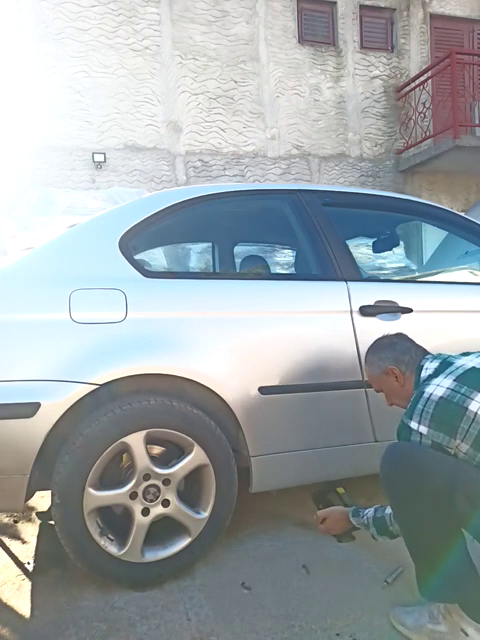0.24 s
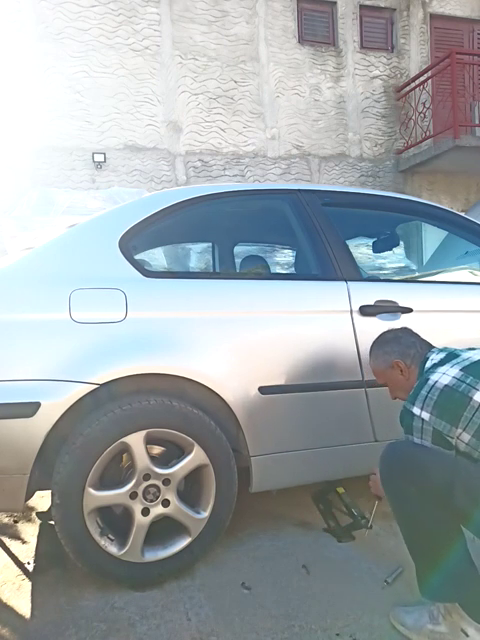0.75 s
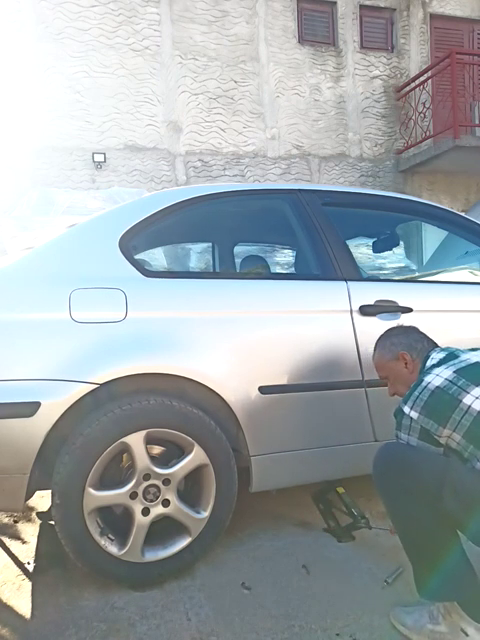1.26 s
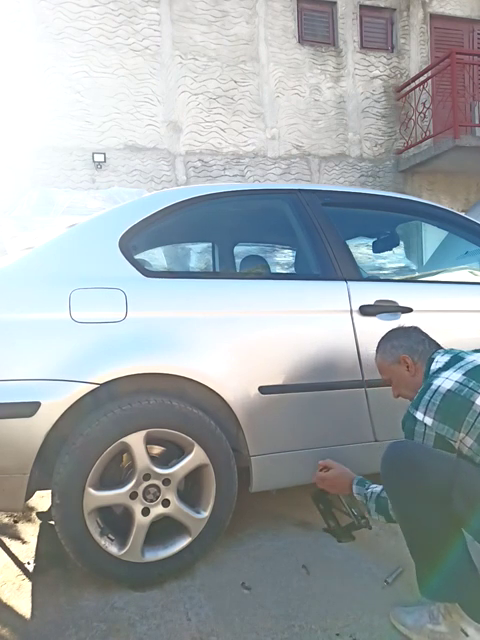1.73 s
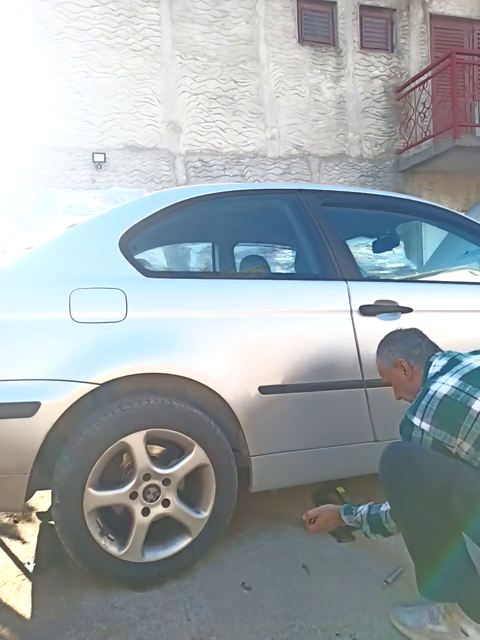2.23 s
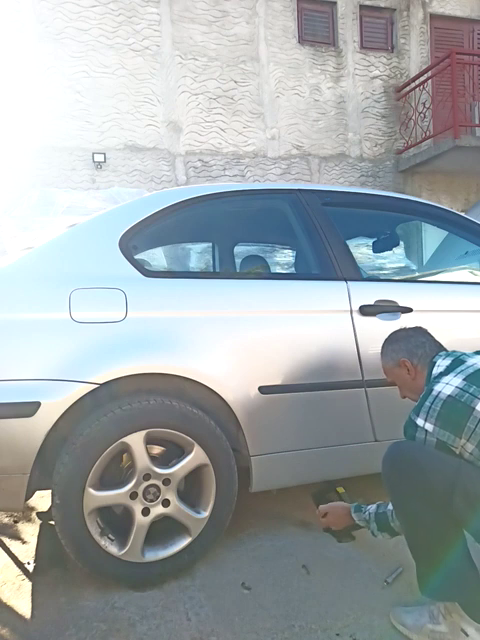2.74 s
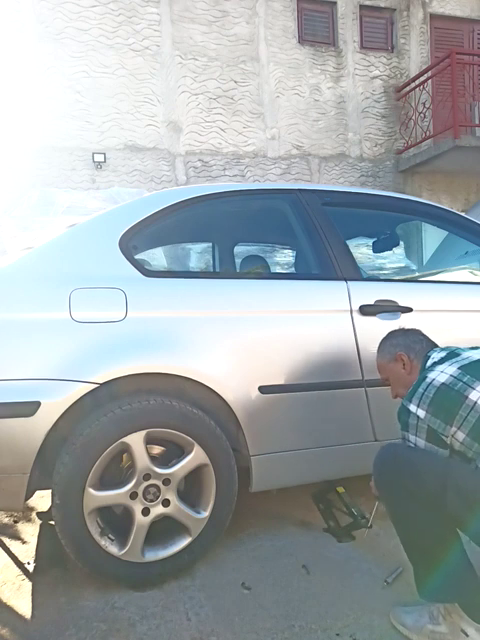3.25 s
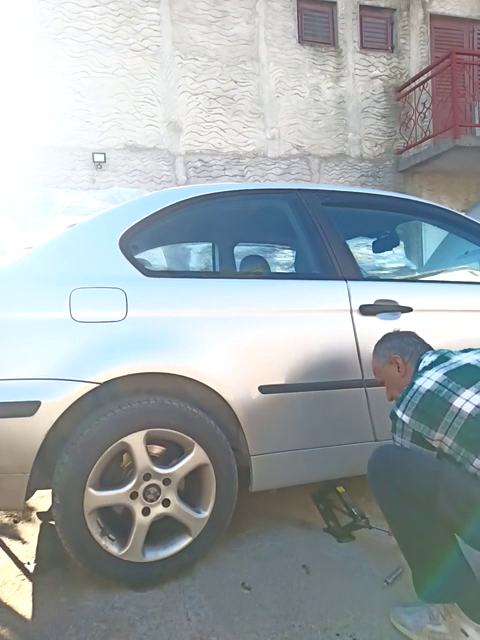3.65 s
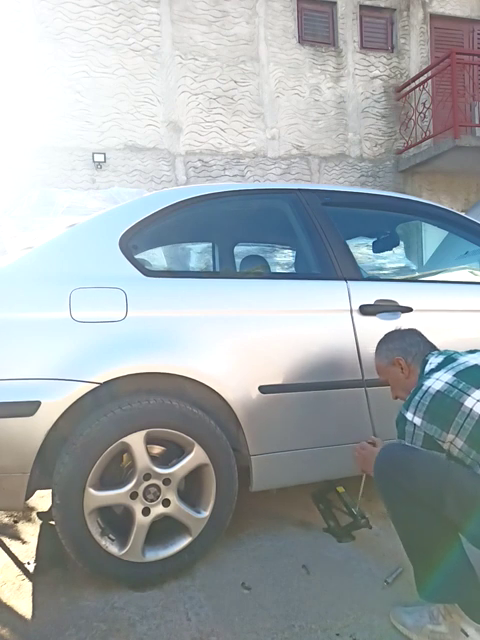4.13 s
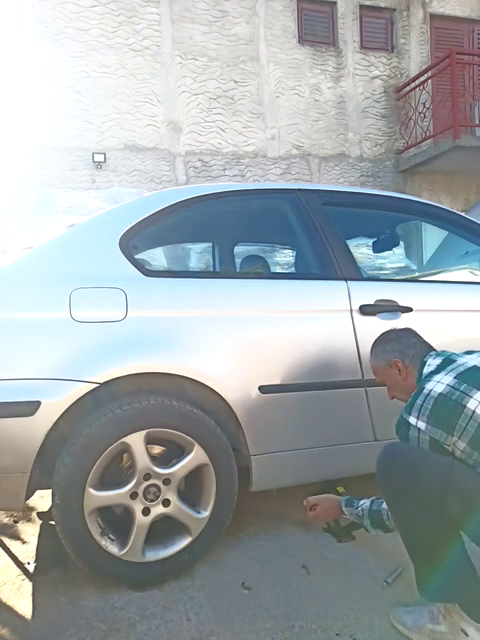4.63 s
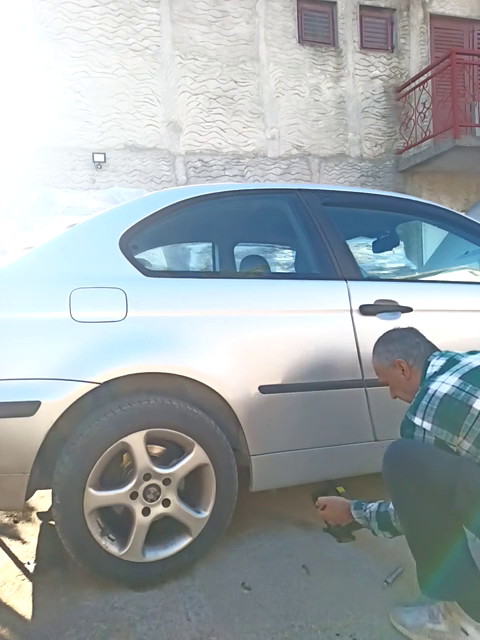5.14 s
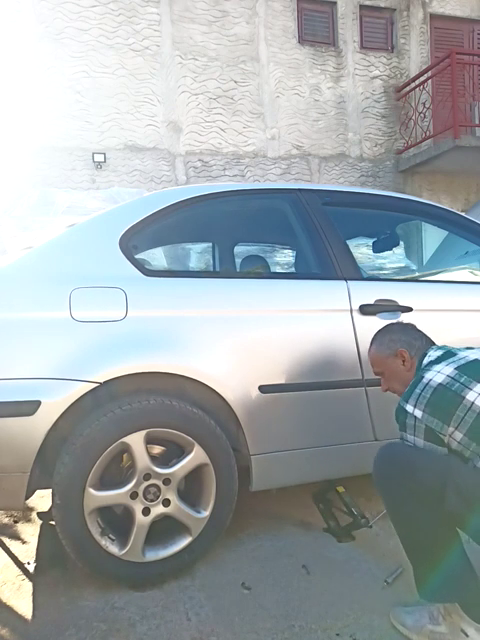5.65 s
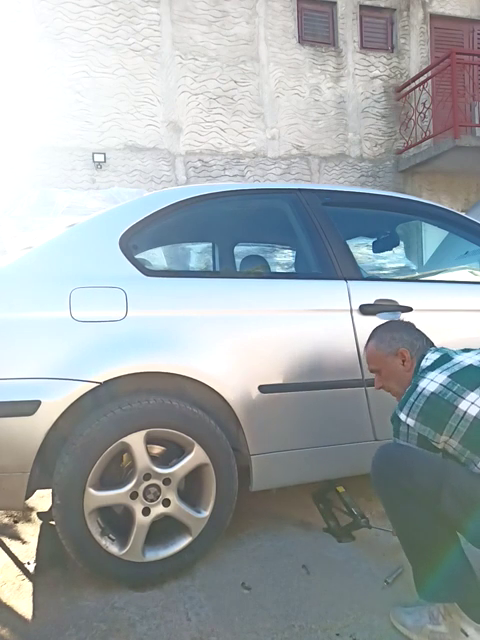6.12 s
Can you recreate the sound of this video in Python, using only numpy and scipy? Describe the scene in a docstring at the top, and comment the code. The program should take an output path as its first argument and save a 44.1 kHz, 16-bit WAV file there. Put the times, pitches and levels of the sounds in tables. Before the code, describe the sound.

Close, dry steel sounds: a screw rasps and squeaks roughly in its nut while the crank handle clacks against a rattly frame with a short ring. Woody knocks come early with slight echo off car and walls. Pauses expose soft hiss, rumble and low wind buffeting on a small outdoor microphone. The strongest clanks fall after four seconds; then activity fades to faint ticks and a thin whine.

```python
"""A steel scissor jack is cranked by hand under a car in a walled yard: crank blows (short noise chatter)
and screw rasps (dense random clicks) both ring one steel frame (decaying sines over dense noise).
Dry knocks (pulse, ring, echo), hollow ticks (narrow noise bursts) and faint pings (single sines) sound nearby.
Wind buffets the microphone (slow noise and single puffs); rumble, air, hiss and a hum near 1 kHz, which also
rises during the cranking, lie under it all (filtered noise). A thin whine (resonant noise) swells at the end."""
import sys
import numpy as np
from scipy import signal
from scipy.fft import rfft, irfft
from scipy.io import wavfile
from scipy.ndimage import uniform_filter1d

SR = 44100
rng = np.random.default_rng(int(sys.argv[2]) if len(sys.argv) > 2 else 0)


def store_wav(level_fs):
    """Save 16-bit WAV to argv[1]."""
    pcm = np.round(np.clip(np.atleast_2d(level_fs), -1, 1) * 32767)
    wavfile.write(sys.argv[1], SR, pcm.T.astype(np.int16))


N = 281257
TIME = np.arange(N) / SR


def from_db(db):
    """Amplitude ratio of a level in dB."""
    return 10 ** (np.asarray(db) / 20)


def rms_one(x):
    """Scale to an RMS of 1."""
    return x / np.sqrt(np.mean(x ** 2) + 1e-20)


def in_time(rows):
    """Each column after t/s, interpolated linearly over the whole scene."""
    t_s, *columns = np.transpose(rows)
    return [np.interp(TIME, t_s, column) for column in columns]


def at_hz(points, hz, axis=1):
    """One column of a frequency table, interpolated on log frequency."""
    points = np.array(points)
    return np.interp(np.log(hz), np.log(points[:, 0]), points[:, axis])


def band(x, low_hz, high_hz, order=2):
    """Causal Butterworth band-pass."""
    sos = signal.butter(order, [low_hz, high_hz], "band", fs=SR, output="sos")
    return signal.sosfilt(sos, x + 1e-18)


def colour(x, points):
    """Causal filter with a (f/Hz, level/dB) curve; the folded cepstrum gives minimum phase."""
    size = len(x) + len(x) % 2
    hz = np.maximum(np.fft.rfftfreq(size, 1 / SR), 1)
    log_gain = np.log(from_db(at_hz(points, hz)))
    cepstrum = irfft(log_gain, size)
    cepstrum[1:size // 2] *= 2
    cepstrum[size // 2 + 1:] = 0
    response = np.exp(rfft(cepstrum))
    return irfft(rfft(x, size) * response, size)[:len(x)]


def drift(rate_hz):
    """Slow random curve of RMS 1: noise through two equal one-pole low-passes."""
    r = np.exp(-2 * np.pi * rate_hz / SR)
    white = rng.standard_normal(N + SR)
    settled = signal.lfilter([1], [1, -2 * r, r * r], white)[SR:]
    return rms_one(settled)


def dying(t60_s, size):
    """Exponential decay, -60 dB at t60_s."""
    return from_db(-60 * np.arange(size) / SR / t60_s)


def modes(table, size):
    """Sum of decaying sines: the answer of a set of modes to one click."""
    time = TIME[:size]
    return sum(from_db(db) * dying(t60_s, size) * np.sin(2 * np.pi * hz * time) for hz, db, t60_s in table)


# frequency ranges in which the jack is driven: low f/Hz, high f/Hz
RANGES_HZ = [(150, 420), (520, 1250), (1250, 2600), (2600, 4200), (4200, 7500), (7500, 12000),
             (12000, 18000)]
# screw turning in its nut, one curve a stroke: t/s, level/dB (upper five ranges), body level/dB (lower two)
RASP_STROKES = [
    [(0.0, -51, -60), (0.012, -63.5, -68), (0.03, -54, -73.5), (0.09, -50.5, -72), (0.128, -48.5, -67),
     (0.142, -57.5, -63), (0.166, -41.5, -51.5), (0.192, -52, -44.5), (0.27, -96, -82.5)],
    [(1.3, -81, -73), (1.35, -61, -60.5), (1.384, -45.5, -61), (1.414, -47.5, -79), (1.43, -41, -73),
     (1.445, -92, -80), (1.5, -75, -81)],
    [(2.34, -66, -79), (2.368, -69.5, -85), (2.41, -55.5, -90), (2.452, -55.5, -80), (2.486, -45.5, -61),
     (2.586, -52.5, -53.5), (2.604, -68, -52.5), (2.638, -75, -58), (2.7, -99, -119)],
    [(3.845, -71.5, -80), (3.86, -64, -64.5), (3.912, -57.5, -56.5), (3.922, -49, -63), (3.942, -47, -61),
     (3.976, -59, -77), (3.988, -47, -73), (4.03, -50, -79), (4.038, -45.5, -70), (4.076, -100, -79),
     (4.1, -64, -96)],
    [(4.565, -82.5, -90), (4.583, -61.5, -98), (4.594, -54.5, -70)],
    [(4.695, -56, -64), (4.723, -53, -61), (4.76, -55, -86), (4.8, -62.5, -68)],
    [(4.8, -54, -76), (4.838, -54.5, -73), (4.89, -49.5, -71.5), (4.916, -69.5, -55.5), (4.956, -88.5, -95)],
]
# per stroke: extra brightness/dB
RASP_BRIGHT_DB = [0, 3.5, 0, 0, 4, 0.5, -2]
# per range: colour of a plain stroke, level/dB
RASP_COLOUR_DB = [-16, 1, 0, -3.5, -9.5, -37, -54]
# per range: share of the brightness [dB/dB]
RASP_BRIGHT_SHARE = [-3.5, 1, 0, 0.7, 0.4, 1, 0]
SLIPS_PER_S, SLIP_SPREAD_DB, SLIP_FLUTTER_DB = 800, 5.5, 2.5
RASP_BRIGHT_DB_PER_DB, RASP_PLAIN_DB = 0.2466, -48.5   # louder is brighter
RASP_WANDER_DB = 2   # the contact moves, so each range swells on its own


def rasps():
    """Force on the frame, range by range: the thread slips in dense uneven clicks."""
    clicks = (rng.random(N) < SLIPS_PER_S / SR) * rng.choice([-1, 1], N)
    spread_db = SLIP_SPREAD_DB * np.minimum(rng.exponential(1, N), 4)
    slips = clicks * from_db(spread_db + SLIP_FLUTTER_DB * drift(90))
    slips /= np.sqrt(uniform_filter1d(slips ** 2, size=900) + 1e-9)   # slip strength is evened out over 20 ms
    force = np.zeros((len(RANGES_HZ), N))
    for stroke, bright_db in zip(RASP_STROKES, RASP_BRIGHT_DB):
        level_db, body_db = in_time(stroke)
        turning = (TIME >= stroke[0][0]) & (TIME <= stroke[-1][0])
        bright_db = bright_db + RASP_BRIGHT_DB_PER_DB * (level_db - RASP_PLAIN_DB)
        shape_db = np.array(RASP_COLOUR_DB)[:, None] + np.outer(RASP_BRIGHT_SHARE, bright_db)
        range_db = np.array(2 * [body_db] + 5 * [level_db])
        force += turning * from_db(range_db + shape_db)
    wander_db = RASP_WANDER_DB * np.array([drift(15) for _ in RANGES_HZ])
    return force * from_db(wander_db) * rms_one(slips)


# clear modes of the jack frame: f/Hz, level/dB, t60/s
FRAME_MODES = [(266, -4, .17), (628, -7, .12), (800, -13, .12), (910, -11, .12), (1055, -7, .2),
               (4400, -14, .08), (1528, -17, .42), (1558, -18, .25), (1700, -12, .08), (1865, -7, .09),
               (1914, -7, .1), (2014, -1, .09), (2067, -3, .09), (2212, -12, .11), (2307, -10, .15),
               (2465, -8, .08), (2792, -6, .09), (2892, -4, .08), (3145, -6, .08), (3208, -9, .11),
               (3308, -4, .09), (3497, -6, .09), (4250, -15, .09), (4678, -14, .08), (5082, -14, .07),
               (5377, -9, .075), (6040, -12, .05), (6369, -11, .07), (6720, -13, .07), (9200, -20, .05)]
# countless small modes and the underside of the car: f/Hz, relative density/dB per Hz, t60/s
DENSE_MODES = [(200, -3.5, 0.24), (444, -33, 0.18), (800, -5, 0.3), (1510, -4, 0.18), (2700, 5, 0.11),
               (4180, -2.5, 0.083), (6900, -9, 0.11), (10520, -4, 0.049), (16000, -7, .075)]
DENSE_DB, CONTACT_DB = 10.5, 28.5


def frame_answer(size=26000):
    """Clear modes over noise that dies band by band, led by the bare click of the contact."""
    edges_hz = 140 * 2 ** np.arange(0, 7.1, .5)
    white = rng.standard_normal((2, size))
    dense = 0
    for k, (low_hz, high_hz) in enumerate(zip(edges_hz, edges_hz[1:])):
        hz = np.sqrt(low_hz * high_hz)
        decay = dying(at_hz(DENSE_MODES, hz, axis=2), size)
        dense = dense + from_db(at_hz(DENSE_MODES, hz)) * band(white[k % 2], low_hz, high_hz) * decay
    click = from_db(CONTACT_DB) * (np.arange(size) == 0)
    contact = band(click, 1500, 18000, order=1)
    return modes(FRAME_MODES, size) + from_db(DENSE_DB) * dense + contact


# microphone response: f/Hz, level/dB
MICROPHONE = [(100, -5), (6800, -6.5), (8000, -19), (12500, -22.5), (14500, -8), (15600, 9.5),
              (17000, -12.5)]
# the frame radiates poorly between its mode families: f/Hz, level/dB
RADIATION = [(330, 0), (400, -14), (560, -14), (610, 0), (1100, 0), (1200, -9), (1450, -9), (1510, 0),
             (3600, 0), (3900, -4), (5450, 0), (5700, -8), (5950, 0)]


def jack():
    """Blows and slips ring the same steel; a blow is scaled by the answer's peak, a rasp by its energy."""
    answer, out = frame_answer(), 0
    for blow, slip, (low_hz, high_hz) in zip(clanks(), rasps(), RANGES_HZ):
        part = band(answer, low_hz, high_hz)
        heard = colour(part, MICROPHONE)
        force = blow / np.abs(heard).max() + slip / np.sqrt(np.sum(heard ** 2))
        out = signal.fftconvolve(force, part)[:N] - out   # alternate signs add up where ranges meet
    return colour(out, RADIATION)


# wind on the microphone: t/s, mean level/dB
WIND = [(0.0, -63), (0.16, -50.5), (0.3, -53), (0.36, -46), (0.5, -46.5), (0.56, -53.5), (1.06, -60.5),
        (1.11, -48), (1.17, -57), (1.24, -48.5), (1.45, -48.5), (1.6, -66.5), (2.2, -67), (2.46, -48),
        (2.54, -50), (2.64, -49.5), (2.8, -61), (2.96, -71.5), (3.5, -70), (3.6, -65), (4.1, -59),
        (4.45, -66.5), (4.6, -48), (4.93, -53), (5.0, -65.5), (5.18, -59), (5.3, -66.5), (5.6, -61),
        (5.85, -70.5), (5.95, -63.5), (6.38, -66.5)]
# single strong puffs: t/s, level/dB, f/Hz
PUFFS = [(0.35, -43, 92), (0.432, -37.5, 86), (0.477, -34, 77), (0.519, -34.5, 90), (1.105, -28, 130),
         (1.235, -31, 89), (1.294, -35.5, 175), (2.582, -34.5, 108), (2.831, -50, 189), (4.07, -46, 120),
         (4.554, -34.5, 86), (4.754, -37, 170), (4.955, -35, 120)]
PUFF_CYCLES = 0.28
WIND_LUMP_DB, WIND_SWELL_DB = 4, 2
# upper band relative to the lower one: its share grows with the wind
WIND_UPPER_DB, WIND_UPPER_SWAY_DB, WIND_UPPER_DB_PER_DB = -14.5, 3, 0.56


def wind():
    """Eddies push the diaphragm in lumps of a few slow cycles; the strongest come as single puffs."""
    level_db = in_time(WIND)[0] + WIND_SWELL_DB * drift(3.5)
    white = rng.standard_normal(N) * from_db(WIND_LUMP_DB * drift(23))
    low = rms_one(band(white, 46, 116.0, order=3))
    upper = rms_one(band(white, 113.4, 242, order=3))
    upper_db = WIND_UPPER_DB + WIND_UPPER_DB_PER_DB * (level_db + 63.5) + WIND_UPPER_SWAY_DB * drift(6)
    eddies = from_db(level_db) * (low + from_db(upper_db) * upper)
    puffs = 0
    for t_s, db, hz in PUFFS:
        cycles = (TIME - t_s) * hz
        swell = np.exp(-.5 * (cycles / PUFF_CYCLES - 1) ** 2)
        puffs = puffs + from_db(db) * swell * np.sin(2 * np.pi * cycles)
    return band(eddies + puffs, 49, 690)


# hum near 1 kHz, which also rises during the cranking: t/s, mean level/dB
HUM = [(0.0, -67), (0.87, -71.5), (1.3, -79), (2.0, -72.5), (2.5, -70.5), (3.0, -87), (4.4, -83),
       (4.7, -67.5), (5.0, -78.5), (6.38, -88.5)]
# spectrum of air and hiss: f/Hz, relative density/dB per Hz
AIR = [(88, -27.5), (150, 5.5), (190, -8.5), (376, -4), (414, -10), (662, -10), (1060, -11), (1190, -12),
       (1600, -12), (2500, -17.5), (5570, -25), (8230, -35), (13400, -34.5), (15100, -22.5), (16000, -34.5)]
AIR_DB, RUMBLE_DB, WHISPER_DB = -73.5, -81.5, -84
HISS_CUTOFF_HZ = 16200


def background():
    """Filtered noises: air, low rumble, hiss near 5 kHz, and a hum near 1 kHz that rises and falls."""
    white = rng.standard_normal((4, N))
    air = from_db(AIR_DB) * rms_one(colour(white[0], AIR))
    air = signal.sosfilt(signal.cheby2(20, 60, HISS_CUTOFF_HZ, fs=SR, output="sos"), air)
    rumble = from_db(RUMBLE_DB + 1.3 * drift(1.1)) * rms_one(band(white[1], 160, 700))
    hum = from_db(in_time(HUM)[0] + 0.5 * drift(10)) * rms_one(band(white[2], 860, 1105))
    whisper = from_db(WHISPER_DB + 2.5 * drift(3)) * rms_one(band(white[3], 3700, 6200))
    return air + rumble + hum + whisper


# crank against frame: t/s, level/dB, extra body/dB, extra brightness/dB, extra edge/dB, chatter decay/s
CLANKS = [(0.1165, -32.5, -10, 6.5, -26, 0.0017), (1.4335, -42, -20, 18, 9, 0.0058),
          (2.0903, -28, 2.5, 0, -9, 0.0033), (2.212, -38, -3, -6, -9, 0.017),
          (2.2603, -22.5, -2, -3.5, 30.5, 0.001), (2.2698, -26, 3.5, 0.5, 22, 0.0073),
          (2.416, -46, -9, -11, -16, 0.004), (2.4581, -31.5, -6, 7, -14.5, 0.0042),
          (3.0402, -49, -21.5, 17.5, 12.5, 0.006), (3.1273, -67, 15.5, 8, -4.5, 0.0007),
          (3.701, -66, 7.5, -4, 4.5, 0.0023), (3.8382, -53, 0, -10.5, 0, 0.0026),
          (3.916, -33, -21.5, -16, -20, 0.0036), (3.9797, -33, 0, 1, -30, 0.0024),
          (4.0193, -33.5, 0, 1.5, -18, 0.0036), (4.3807, -19.5, 1.5, -0.5, 6.5, 0.0016),
          (4.4627, -39, 6.5, -1, -8.5, 0.0036), (4.6012, -21.5, 0.5, -0.5, 17, 0.002),
          (4.6817, -35.5, -13, -0.5, -15, 0.0025)]
# per range: colour of a plain blow, level/dB
CLANK_COLOUR_DB = [-16, -22, -2.5, -7.5, -3, -13.5, -34]
# per range: share of the extra body [dB/dB]
CLANK_BODY_SHARE = [0.017, 2.1, 0, 0.43, 0.11, 0.15, 0.63]
# per range: share of the extra brightness [dB/dB]
CLANK_BRIGHT_SHARE = [0.14, 0, 0.047, 0.58, 1.05, 0.99, 0.087]
# per range: share of the extra edge [dB/dB]
CLANK_EDGE_SHARE = [0.15, 0.13, 0.022, 0, 0.091, 0.54, 0.96]
THUMP_S = .025   # the car keeps rocking on the jack, so the lowest range is pushed longer


def clanks():
    """Force on the frame: each blow is decaying noise chatter, as strong as one click in every range."""
    force, size = np.zeros((len(RANGES_HZ), N)), 4000
    hz = np.fft.rfftfreq(2 * size, 1 / SR)
    shares = np.array([CLANK_BODY_SHARE, CLANK_BRIGHT_SHARE, CLANK_EDGE_SHARE])
    for t_s, level_db, body_db, bright_db, edge_db, chatter_s in CLANKS:
        decay_s = np.array([THUMP_S] + 6 * [np.clip(chatter_s, .0002, .01)])
        chatter = rng.standard_normal(size) * np.exp(-TIME[:size] / decay_s[:, None])
        power = np.abs(rfft(chatter, 2 * size)) ** 2
        strength = np.sqrt([p[(hz > low) & (hz < high)].mean() for p, (low, high) in zip(power, RANGES_HZ)])
        shape_db = CLANK_COLOUR_DB + np.array([body_db, bright_db, edge_db]) @ shares
        gain = from_db(level_db + shape_db) / strength
        at = round(t_s * SR)
        force[:, at:at + size] += gain[:, None] * chatter
    return force


# dry knocks: t/s, level/dB, centre f/Hz, width/octaves, echo level/dB
KNOCKS = [(0.553, -25, 4750, 2.9, -31), (0.596, -49, 2300, 3.9, -19), (0.677, -15, 1410, 1.4, -25.5),
          (0.745, -14.5, 1380, 1.47, -24), (1.153, -36, 2010, 0.39, -17.5), (5.1, -58.5, 2960, 1.5, -17.5),
          (5.282, -50, 2420, 2.8, -23), (5.695, -55, 2200, 2.2, -20.5)]
# woody ring of a knock: f/Hz, relative level/dB, t60/s
KNOCK_MODES = [(1153, -22, 0.27), (1330, 1, 0.053), (1760, -10, 0.028), (2713, -5, 0.064),
               (3260, -6, 0.035), (3230, -35, 0.048)]
KNOCK_RING_DB, KNOCK_TAIL_T60_S = -8, 0.1
KNOCK_DELAY_S = .0012   # pulse starts this long after the listed time


def knocks():
    """One hard pulse, then a short woody ring and a scattered echo from car and walls."""
    out, size = np.zeros(N + 8000), 8000
    ring = from_db(KNOCK_RING_DB) * modes(KNOCK_MODES, size)
    for t_s, level_db, hz, octaves, echo_db in KNOCKS:
        echo = rng.standard_normal(size) * dying(KNOCK_TAIL_T60_S, size)
        knock = from_db(echo_db) * (ring + echo)
        knock[0] += 1
        spread = 2 ** np.clip(octaves / 2, .1, 1.5)
        knock = band(knock, hz / spread, min(hz * spread, 18000), order=1)
        knock = band(knock, 620, 6400)
        at = round((t_s + KNOCK_DELAY_S) * SR)
        out[at:at + size] += from_db(level_db) * knock / np.abs(knock[:100]).max()
    return out[:N]


# small hollow ticks: t/s, level/dB, f/Hz
TICKS = [(0.955, -54, 2400), (1.1464, -37, 2360), (5.985, -48, 2390)]
TICK_HALF_WIDTH_HZ, TICK_T60_S = 200, 0.061


def ticks():
    """Quickly dying noise through a narrow band."""
    out, size = np.zeros(N), 5000
    for t_s, level_db, hz in TICKS:
        noise = rng.standard_normal(size) * dying(TICK_T60_S, size)
        burst = band(noise, hz - TICK_HALF_WIDTH_HZ, hz + TICK_HALF_WIDTH_HZ)
        at = round(t_s * SR)
        out[at:at + size] += from_db(level_db) * burst / np.abs(burst).max()
    return out


# faint high pings: t/s, level/dB, f/Hz, t60/s
PINGS = [(1.1987, -79, 11720, 0.14), (3.497, -68, 11720, 0.087), (3.6416, -82, 11720, 0.13),
         (3.8417, -79, 11720, 0.1)]
PING_RISE_S = 0.0048


def pings():
    """Single thin modes, softly started."""
    out, size = np.zeros(N), 8000
    rise = 1 - np.exp(-TIME[:size] / PING_RISE_S)
    for t_s, level_db, hz, t60_s in PINGS:
        at = round(t_s * SR)
        out[at:at + size] += modes([(hz, level_db, t60_s)], size) * rise
    return out


# faint thin whine: t/s, level/dB
WHINE = [(6.12, -86.5), (6.128, -72), (6.18, -82.5), (6.196, -74), (6.37, -67)]
# its resonances: f/Hz, half width/Hz, relative level/dB
WHINE_PEAKS = [(852, 44, -4), (1385, 51, 0.5), (1820, 120, 2), (1985, 40, -8), (2600, 35, -13),
               (2790, 23, -11)]


def whine():
    """Noise through a few narrow resonances."""
    white, out = rng.standard_normal(N), 0
    for hz, half_width_hz, db in WHINE_PEAKS:
        out = out + from_db(db) * rms_one(band(white, hz - half_width_hz, hz + half_width_hz))
    sounding = TIME > WHINE[0][0]
    return sounding * from_db(in_time(WHINE)[0]) * rms_one(out)


def scene():
    """Jack, knocks and ticks take the microphone colour; the other layers are added as they are."""
    struck = colour(jack() + knocks() + ticks(), MICROPHONE)
    return (struck + pings() + whine() + wind() + background())[None]


CUTOFF_HZ = 17350


def record(dry):
    """A steep low-pass cuts the top."""
    return signal.sosfilt(signal.cheby2(12, 70, CUTOFF_HZ, fs=SR, output="sos"), dry)


dry = scene()
out = record(dry)
store_wav(out)
```